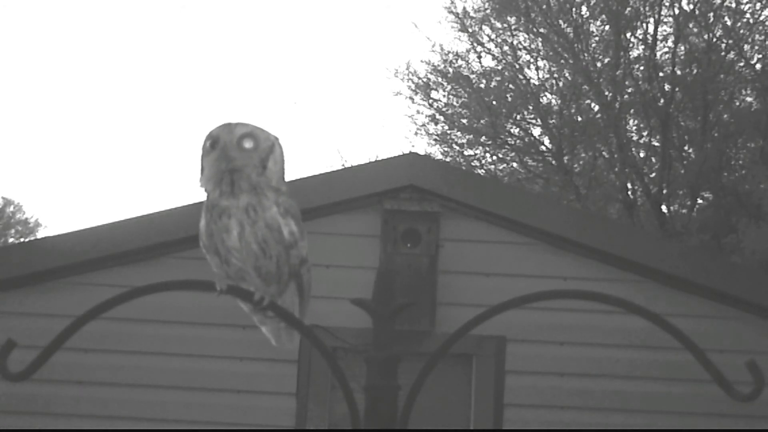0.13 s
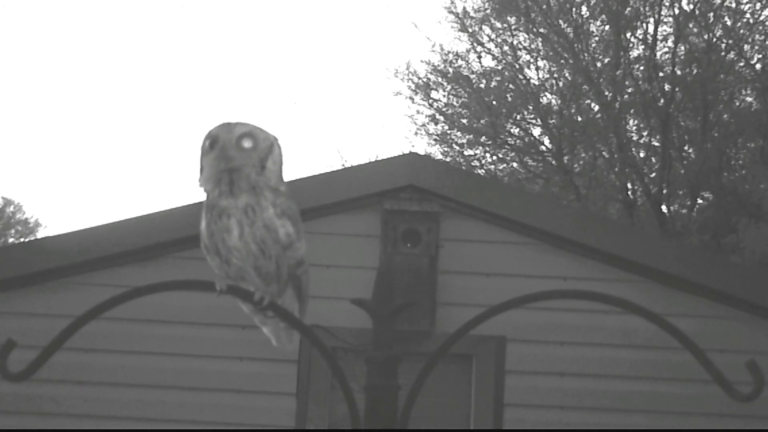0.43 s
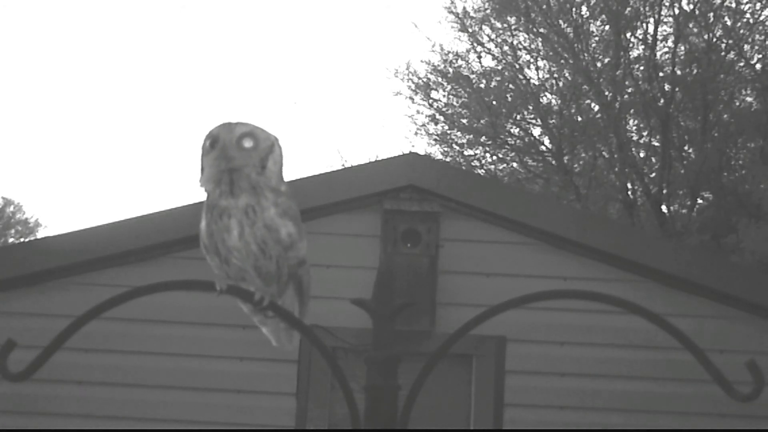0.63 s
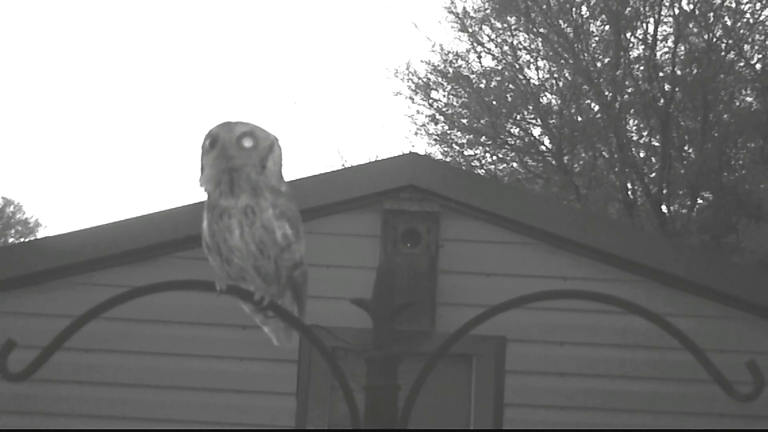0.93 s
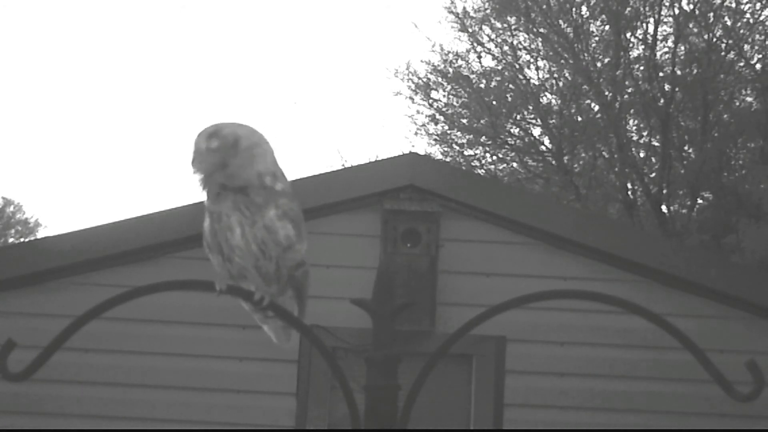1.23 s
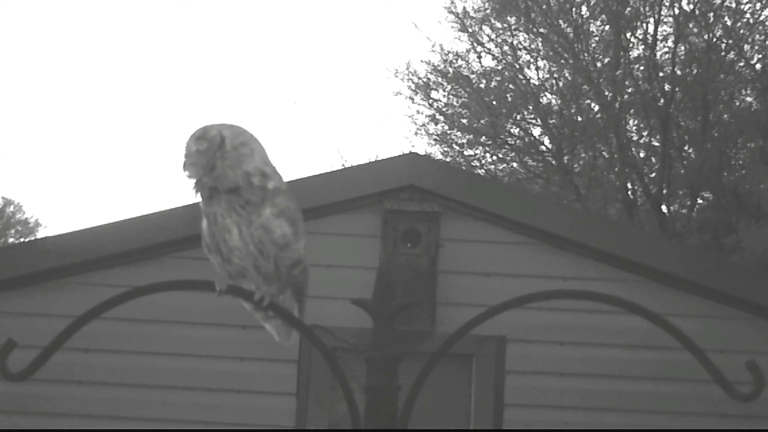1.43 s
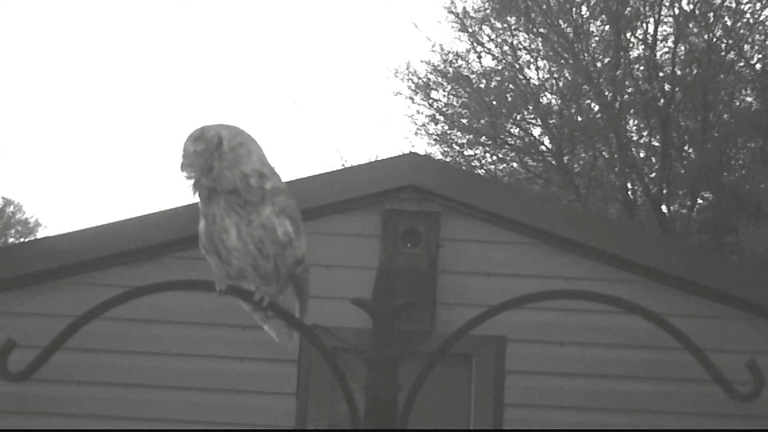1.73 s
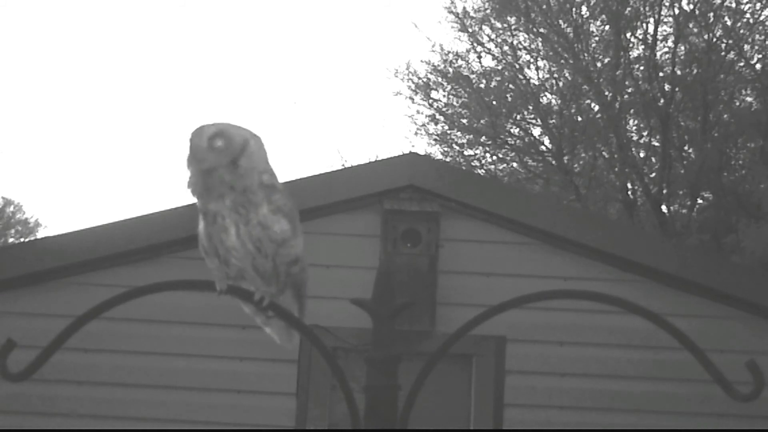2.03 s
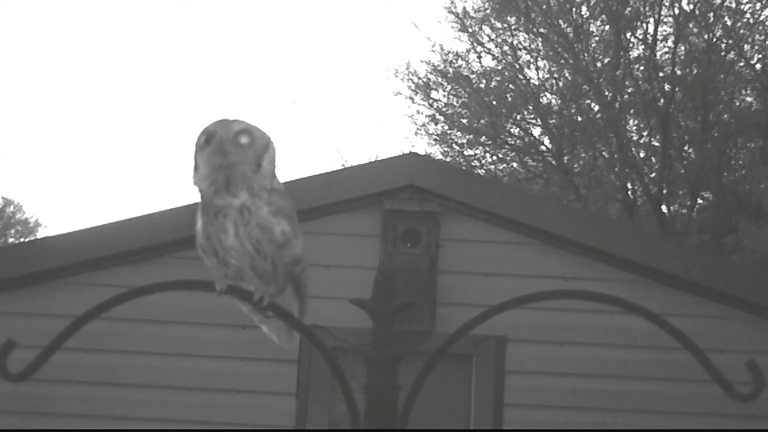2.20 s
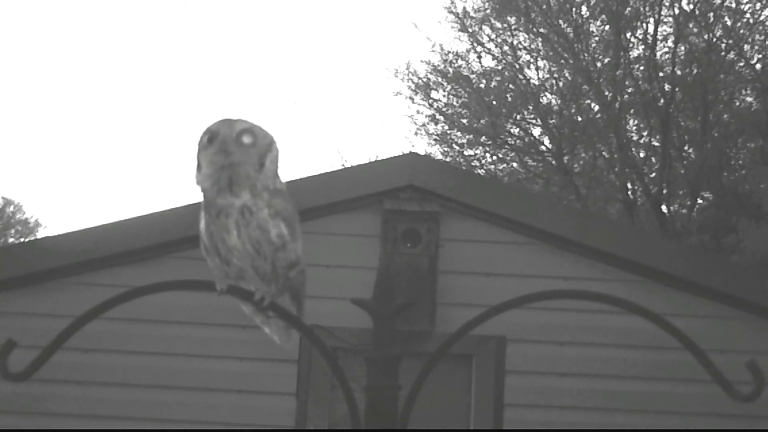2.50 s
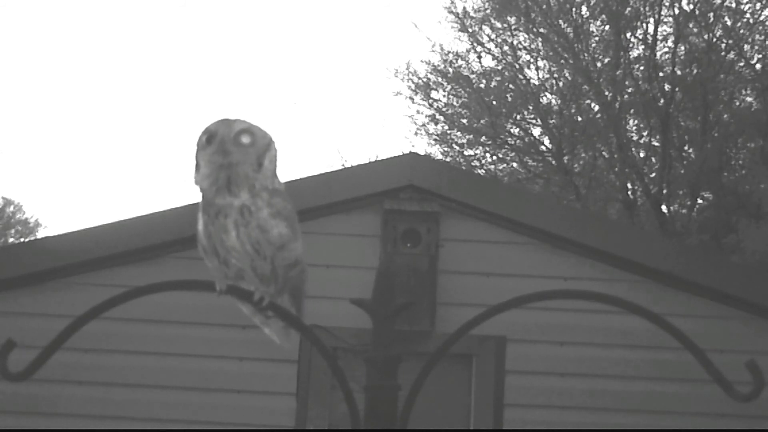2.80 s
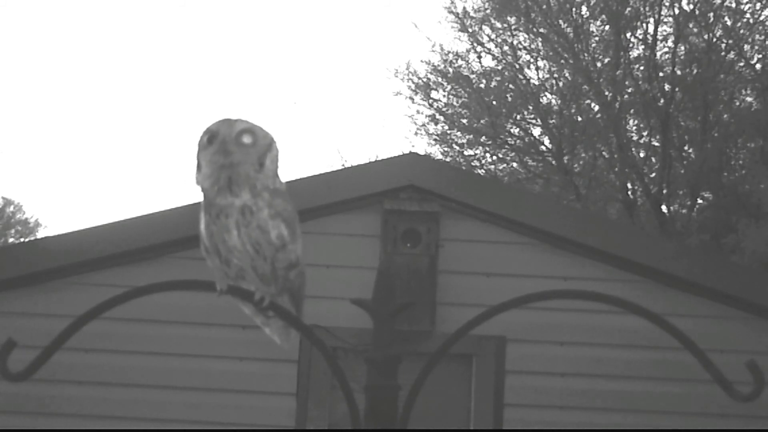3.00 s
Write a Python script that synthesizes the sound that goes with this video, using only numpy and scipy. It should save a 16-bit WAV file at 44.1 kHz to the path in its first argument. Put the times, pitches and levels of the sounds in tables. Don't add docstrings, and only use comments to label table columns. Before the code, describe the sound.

Small owl trilling continuously, about fifteen mellow low hoots a second, growing louder in a quiet yard.

```python
import sys
import numpy as np
from scipy import signal
from scipy.fft import rfft, irfft
from scipy.io import wavfile

SR = 44100
rng = np.random.default_rng(int(sys.argv[2]) if len(sys.argv) > 2 else 0)


def gain_from_db(level_db):
    decades = np.asarray(level_db, float) / 20
    return 10 ** decades


def wrap_up_sound(samples):
    columns = np.atleast_2d(samples).T
    tamed = np.clip(columns, -1, 1)
    steps = np.round(tamed * 32767).astype(np.int16)
    wavfile.write(sys.argv[1], SR, steps)


N = 138915
TIME_S = np.arange(N) / SR
BIN_HZ = np.fft.rfftfreq(N, 1 / SR)


def evened(x):
    return x / np.sqrt(np.mean(x ** 2) + 1e-20)


def add(mix, start_s, sound):
    at = round(start_s * SR)
    sound = sound[max(-at, 0):]
    part = mix[max(at, 0):][:len(sound)]
    part += sound[:len(part)]


def curve(points):
    time_s, level_db = np.transpose(points)
    return np.interp(TIME_S, time_s, level_db)


def filtered_noise(gain):
    return evened(irfft(rfft(rng.standard_normal(N)) * gain, N))


def drift(top_hz):
    return filtered_noise(np.exp(-(BIN_HZ / top_hz) ** 2))


def coloured(spectrum):
    freq_hz, level_db = np.transpose(spectrum)
    shape_db = np.interp(np.log(BIN_HZ + 1), np.log(freq_hz + 1), level_db, right=-100)
    return filtered_noise(gain_from_db(shape_db))


def whistle(hz, width_hz):
    return filtered_noise(1 / (1 + ((BIN_HZ - hz) / (width_hz / 2)) ** 4))


# freq_hz, density_db
AIR_SPECTRUM = [(88, -46), (150, -13), (480, -16.5), (1000, -23), (4300, -31.5), (5800, -38), (13800, -40),
                (13960, -43)]


def air_hiss():
    return gain_from_db(-57 + 0.14 * drift(2.2)) * coloured(AIR_SPECTRUM)


def camera_whine():
    return gain_from_db(-79 + drift(3.3)) * np.sin(2 * np.pi * 2044 * TIME_S)


# freq_hz, density_db
WIND_SPECTRUM = [(2.4, -22), (6, -10), (28, 1), (45, -4.5), (124, -11.5), (300, -25), (390, -35.5),
                 (660, -120)]
# time_s, level_db
GUSTS = [(0, -46.5), (.5, -48.5), (.75, -47), (.95, -49.5), (1.5, -47), (1.9, -48.5), (2.2, -46.5),
         (2.4, -49.5), (2.7, -47), (2.8, -46.5), (2.9, -45), (2.96, -48), (3.02, -45.5), (3.15, -49)]
# center_s, width_s, level_db, direction (push +1, pull -1)
BUFFETS = [
    (2.383, .01, -38, 1),
    (2.818, .014, -34, -1),
    (2.889, .008, -31, 1),
    (3.01, .013, -35, -1),
]


def wind():
    out = coloured(WIND_SPECTRUM) * gain_from_db(curve(GUSTS) + 2.5)
    for center_s, width_s, level_db, direction in BUFFETS:
        u = (TIME_S - center_s) / width_s
        out += direction * gain_from_db(level_db) * (1 - u ** 2) * np.exp(-0.75 * u ** 2)
    return out


# pitch_hz, width_hz, level_db, chirps_per_s, throb_db
CRICKETS = [(5070, 100, -75, 3.1, 2.5), (5245, 60, -75.5, 2.3, 2.5), (5375, 60, -78, 2.9, 2.5),
            (5550, 40, -79, 4.2, 2), (5630, 60, -80, 3.5, 2), (5170, 90, -79, 2.6, 2),
            (5300, 600, -74.5, 3.3, 1), (4150, 400, -79, 9, .3), (780, 50, -77, 3, 1.5)]
# time_s, level_db
CHORUS = [(0.0, -67), (0.34, -71), (0.39, -69), (0.87, -69), (0.94, -72), (1.02, -66.5), (1.24, -70),
          (1.98, -68.5), (1.99, -70.5), (2.25, -69), (3.11, -71), (3.15, -69)]
# time_s, level_db
TREE_CRICKET = [(0, -79), (.9, -78), (2.0, -84), (2.5, -75), (2.7, -71.5), (3.15, -77)]


def crickets():
    chorus = np.zeros(N)
    for pitch_hz, width_hz, level_db, chirps_per_s, throb_db in CRICKETS:
        throb = gain_from_db(throb_db * drift(chirps_per_s) + 1.3 * drift(36))
        chorus += gain_from_db(level_db - 0.5) * evened(whistle(pitch_hz, width_hz) * throb)
    chorus *= evened(gain_from_db(1.3 * curve(CHORUS)))
    tree_beats_per_s = 11
    beat = 0.82 + 0.59 * np.cos(2 * np.pi * tree_beats_per_s * (TIME_S - 2.7))
    return chorus + gain_from_db(curve(TREE_CRICKET)) * beat * whistle(3710, 130)


# start_s, length_s, level_db, from_hz, to_hz
BIRD = [
    (2.772, 0.072, -76, 2330, 2290),
    (2.792, 0.061, -69, 2374, 2386),
    (2.89, 0.027, -70, 2290, 2270),
    (2.952, 0.04, -72, 2440, 2470),
    (2.967, 0.043, -76, 2380, 2330),
    (2.997, 0.029, -71, 2720, 2560),
    (3.019, 0.046, -72, 2400, 2520),
    (3.08, 0.045, -71, 2400, 2270),
    (3.106, 0.032, -73, 2660, 2700),
]


def bird():
    out = np.zeros(N)
    for start_s, length_s, level_db, from_hz, to_hz in BIRD:
        u = np.arange(0, 1, 1 / (length_s * SR))
        hz = from_hz + (to_hz - from_hz) * u + 15 * drift(40)[:len(u)]
        tone = np.sin(2 * np.pi * np.cumsum(hz) / SR)
        add(out, start_s, gain_from_db(level_db + 4) * np.sin(np.pi * u) ** 0.44 * tone)
    return out


# delay_s, level_db
ECHOES = [
    (.007, -27),
    (.021, -21.5),
    (.034, -27),
]


def yard(x):
    tail_db, t60_s, treble_cutoff_hz, tilt = -24, .25, 1800, .7
    taps = np.zeros(SR // 2)
    at = np.arange(900, len(taps) - 20, 20)
    scatter = rng.integers(0, 20, len(at))
    taps[at + scatter] = rng.choice([-1., 1.], len(at)) * gain_from_db(-60 * at / SR / t60_s)
    taps *= gain_from_db(tail_db) / np.linalg.norm(taps)
    for delay_s, level_db in ECHOES:
        taps[round(delay_s * SR)] += gain_from_db(level_db)
    wet = signal.fftconvolve(x, taps)[:N]
    wet = signal.lfilter(*signal.butter(2, treble_cutoff_hz, fs=SR), wet)
    slope = np.gradient(wet) * SR / (2 * np.pi * 600)
    return (1 - tilt) * wet + tilt * slope


def membrane_pop(hz, turn):
    decay_s = .005
    u = np.arange(0, 3, 1 / (decay_s * SR))
    return u * np.exp(1 - 2 * u) * 2 * np.sin(2 * np.pi * (hz * decay_s * u + 7 * turn))


# time_s, effort_db, mid_hoot_pitch_hz, facing_db
BREATH = [
    (0, -46, 609.6, -16),
    (.55, -42.5, 609, -9),
    (.9, -40, 613, -5),
    (1.5, -39, 610, -12),
    (2.0, -38, 610.3, -17),
    (2.172, -37, 610, 1),
    (2.35, -37.2, 601.5, -2),
    (3.15, -36.5, 599.2, -1),
]
# multiple, level_db at effort -37 dB, effort_growth, facing_share, time_narrowing
PARTIALS = [(1, 0, 0.75, 0.042, 0.81), (2, -12, 1.93, 0, 1.65), (3, -31, 1.9, 0, 6),
            (4, -40, 1.7, 0.44, 2.7), (6, -39, 1.3, .3, 6)]
BEAK = [(11, -52, 1, 1, 1.6), (12, -43.5, 1, 1, 1.6), (13, -39, 1, .8, 1.6), (14, -45.5, 1, 1, 1.6)]


def owl():
    hoots, first_s, gap_s, haste_s = 49, .0179, .066056, .00001916
    rise_s, fall_s, rise_bend, fall_bend = .0215, .021, 1.1, 1.38
    sag_hz_per_s, droop_hz_per_s2 = 780, 16000
    slip_hz, slip_hz_per_s = 10, 900
    lean_db_per_s = 180
    jitter_s, jitter_db, jitter_hz = .0005, .45, 1.8

    k = np.arange(hoots)
    centers_s = first_s + gap_s * k - haste_s * k ** 2
    luck, turns = rng.standard_normal((hoots, 3)), rng.random(hoots)
    time_s, effort_db, pitch_hz, facing_db = np.transpose(BREATH)
    t = np.arange(-rise_s, fall_s, 1 / SR)
    rise = np.cos(np.pi / 2 * t / rise_s).clip(0) ** rise_bend
    fall = np.cos(np.pi / 2 * t / fall_s).clip(0) ** fall_bend
    swell = np.where(t < 0, rise, fall)
    slip = 2 * np.pi * (slip_hz * t + slip_hz_per_s * t ** 2 / 2)
    husk = whistle(865, 1050)

    out = np.zeros(N)
    for center_s, (late, loud, sharp), turn in zip(centers_s, luck, turns):
        push_db = np.interp(center_s, time_s, effort_db) + jitter_db * loud + 37
        facing = np.interp(center_s, time_s, facing_db)
        sag = 1 + .085 * push_db
        roundness = 1 - .05 * push_db
        hz = np.interp(center_s, time_s, pitch_hz) + jitter_hz * sharp
        hz = hz - sag * (sag_hz_per_s * t + droop_hz_per_s2 * t ** 2)
        phase = 2 * np.pi * (np.cumsum(hz) / SR + turn)

        hoot = gain_from_db(-32 + push_db) * np.sqrt(swell) * np.roll(husk, -round(center_s * SR))[:len(t)]
        for multiple, level_db, growth, share, narrowing in PARTIALS + BEAK:
            gain = gain_from_db(level_db + growth * push_db + share * facing)
            shape = swell ** (narrowing * roundness ** min(multiple, 2))
            lean = gain_from_db((multiple > 1.5) * lean_db_per_s * t)
            trail = (round(multiple) == 2) * sag * slip
            hoot += gain * shape * lean * np.cos(round(multiple) * phase - trail)

        pop = membrane_pop(830 * (1 + 0.023 * sharp), turn)
        late_s = jitter_s * late
        add(out, center_s - .021 + late_s, gain_from_db(-56 + push_db + 2.6 * late) * pop)
        add(out, center_s - rise_s + late_s, np.sqrt(2) * gain_from_db(-37) * hoot)
    return out * (1 + .025 * drift(120))


def scene():
    far = bird()
    calls = owl() + far
    bird_echoes = gain_from_db(-3) * np.roll(far, 900) + gain_from_db(-7) * np.roll(far, 2100)
    evening = crickets() + air_hiss() + wind() + camera_whine()
    return (calls + yard(calls) + bird_echoes + evening)[None]


# freq_hz, share of empty slots
HOLES = [(5500, 0), (8300, .02), (9000, .08), (10500, .2), (13600, .2), (13800, .45), (14100, .6)]


def treble_dropouts(x):
    lead, bins_per_slot = 336, 7
    frame = dict(window="cosine", nperseg=2048, noverlap=1024)
    hz, t, z = signal.stft(np.pad(x, ((0, 0), (lead, 0))), SR, **frame)
    luck = rng.random((len(hz) // bins_per_slot + 1, len(t)))
    lasting = rng.random(luck.shape) < .4
    luck = np.where(lasting, np.roll(luck, 1, 1), luck)
    luck = np.repeat(luck, bins_per_slot, 0)[:len(hz)]
    keep = luck > np.interp(hz, *np.transpose(HOLES))[:, None]
    return signal.istft(z * keep, SR, **frame)[1][:, lead:lead + N]


def roll_off(x):
    return signal.sosfilt(signal.butter(12, 14920, fs=SR, output="sos"), x)


def record(dry):
    mix = treble_dropouts(dry)
    return roll_off(mix)


dry = scene()
out = record(dry)
wrap_up_sound(out)
```